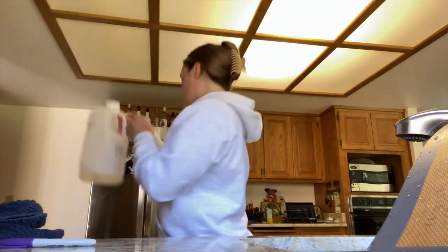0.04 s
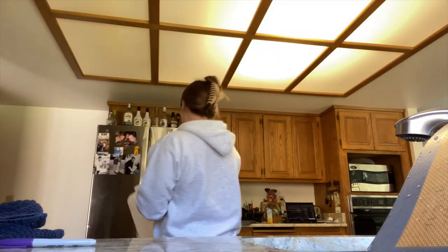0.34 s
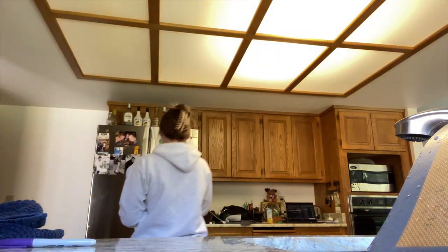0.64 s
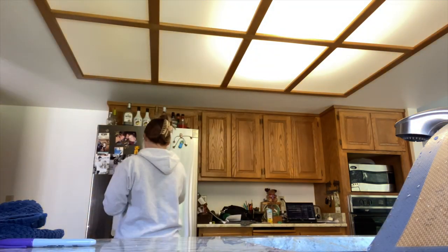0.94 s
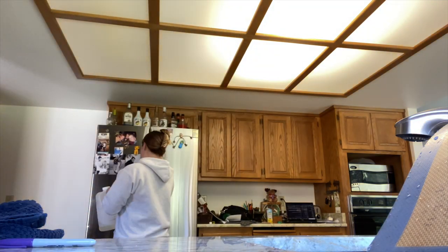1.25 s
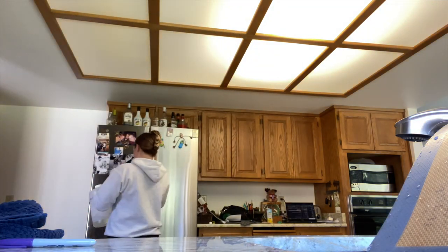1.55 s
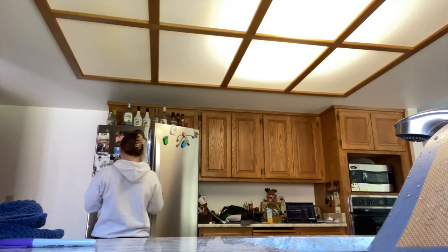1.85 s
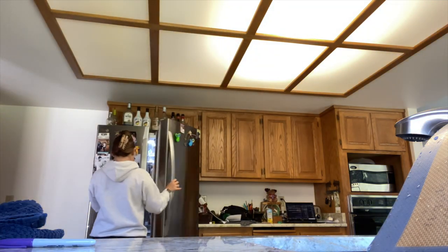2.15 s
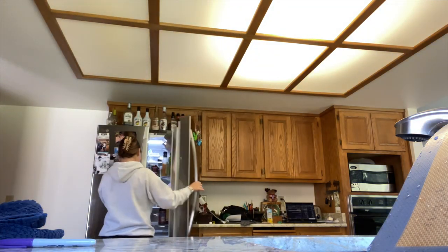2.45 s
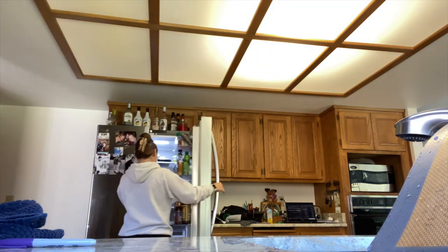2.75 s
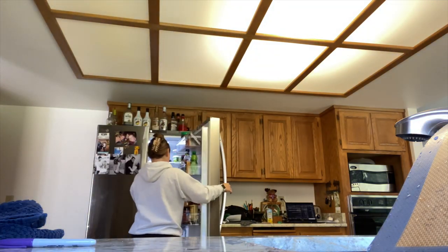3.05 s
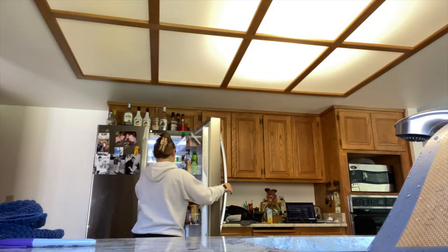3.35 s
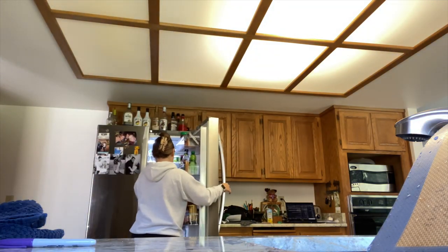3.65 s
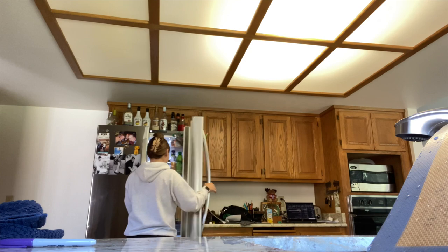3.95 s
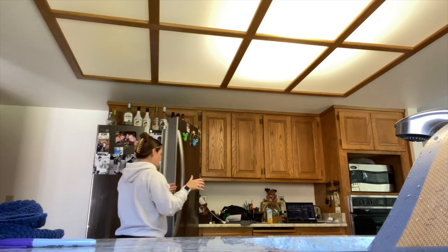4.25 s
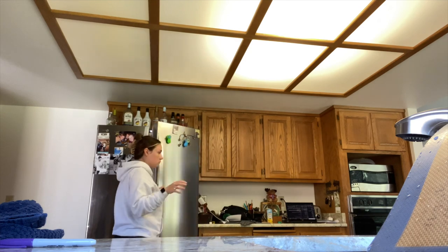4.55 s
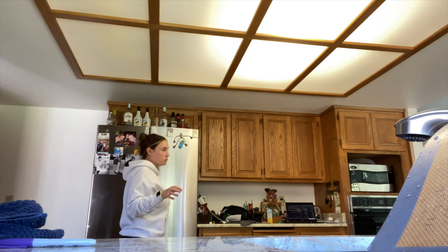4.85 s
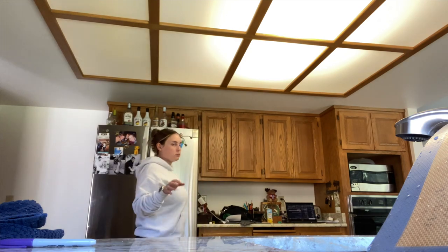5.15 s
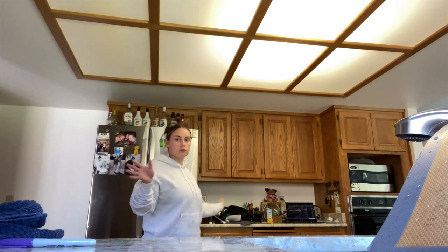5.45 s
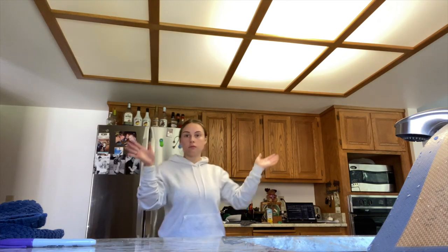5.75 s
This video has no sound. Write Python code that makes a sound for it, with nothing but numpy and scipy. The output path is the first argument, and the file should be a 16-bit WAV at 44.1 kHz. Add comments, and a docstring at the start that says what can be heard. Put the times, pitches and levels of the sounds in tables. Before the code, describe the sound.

Clothes rustle and a plastic jug knocks onto a refrigerator shelf, then the door slams with a hollow thump over a low hum.

```python
"""A jug goes into the refrigerator

Someone in rustling clothes carries a hollow plastic jug across a quiet kitchen and pulls the
refrigerator door off its rubber seal. The jug knocks onto a shelf and slides in; the door slams,
the cabinet booms, the shelf rings and bottles clink. Blows are dying noise plus ringing modes,
rubs are showers of tiny slips. The compressor hums, and a phone a few metres away hears it all."""
import sys
import numpy as np
from scipy import signal
from scipy.fft import rfft, irfft, next_fast_len
from scipy.io import wavfile

SR = 44100
rng = np.random.default_rng(int(sys.argv[2]) if len(sys.argv) > 2 else 0)


def unload_wav(signal):
    """Save mono or channel-first audio to the path in sys.argv[1] as 16-bit WAV at rate SR, clipped to [-1, 1]."""
    wavfile.write(
        sys.argv[1],
        SR,
        np.round(np.clip(np.atleast_2d(signal).T, -1, 1) * 32767).astype(np.int16),
    )


N = 264047
T = np.arange(N) / SR
ALIKE_HZ = 406  # well below this the two microphone ports hear the same


def undb(db):
    """Decibels to gain."""
    return 10 ** (np.asarray(db) / 20)


def fade(t, t60):
    """Exponential decay, 60 dB down after t60 seconds."""
    return np.exp(-np.log(1000) * t / t60)


def onset(t, rise):
    """Attack with a time constant of rise seconds."""
    return 1 - np.exp(-t / rise)


def add(out, start, sound):
    """Mix a sound into out from start seconds."""
    i = int(start * SR)
    out[:, i:i + sound.shape[1]] += sound[:, :N - i]


def butter(hz, kind="low", order=2):
    """A gentle Butterworth filter."""
    return signal.butter(order, hz, kind, fs=SR, output="sos")


def shape(x, *colours):
    """Minimum-phase EQ: the sum of some curves of (Hz, dB) points."""
    size = next_fast_len(x.shape[-1] // 2 + 2048) * 2
    log_hz = np.log(np.fft.rfftfreq(size, 1 / SR) + 1)
    db = sum(np.interp(log_hz, np.log(hz), gains) for hz, gains in map(np.transpose, colours))
    cepstrum = irfft(np.log(undb(db)))
    cepstrum[1:size // 2] *= 2
    cepstrum[size // 2 + 1:] = 0
    return irfft(rfft(x, size) * np.exp(rfft(cepstrum)))[..., :x.shape[-1]]


def ripple(depth_db):
    """An uneven EQ curve: each spot and each path through the room favours other frequencies."""
    hz = np.geomspace(250, 15000, 70)
    return list(zip(hz, depth_db * rng.standard_normal(len(hz))))


def diffuse(size):
    """Noise from all sides at two ports: alike in the bass, unrelated in the treble."""
    alike = np.exp(-(np.fft.rfftfreq(size, 1 / SR) / ALIKE_HZ) ** 2)
    mid, side = rfft(rng.standard_normal((2, size))) * np.sqrt([(1 + alike) / 2, (1 - alike) / 2])
    return irfft(np.array([mid + side, mid - side]), size)


def room(x, direct, t60):
    """Straight sound plus the reverberation of cupboards and walls."""
    tail = diffuse(SR) * fade(T[:SR], t60)
    tail /= np.sqrt(np.sum(tail ** 2) / 2)
    tail[:, 0] += direct
    return signal.fftconvolve(x[None], tail, axes=1)[:, :len(x)] / np.hypot(1, direct)


def ring(modes, rise, scatter=0.0035, widest_rad=0.92):
    """Decaying modes, detuned at random; the higher ones reach the two ports out of step."""
    t, out = T[:SR], 0
    for hz, db, t60 in modes:
        spread = widest_rad * min(hz / (2 * ALIKE_HZ), 1) * rng.choice([-1, 1])
        detuned_hz = hz * (1 + scatter * rng.standard_normal())
        phase = 2 * np.pi * detuned_hz * t + np.array([[.5], [-.5]]) * spread
        out = out + undb(db) * fade(t, t60) * np.sin(phase)
    return out * onset(t, rise)


def blow_noise(t60, rise, room_db=-7.5, room_t60=0.62, sparse_s=0.014, bass_rise_s=0.0087):
    """A blow dying away: a hard first arrival, then separate reflections thicken into a tail."""
    t = T[:SR]
    patches = np.repeat(rng.standard_normal(SR // 30) - .5, 30)
    noise = diffuse(SR) * undb(3 * np.exp(-t / sparse_s) * patches)
    crack = undb(1) * fade(t, t60=0.045)
    tail = undb(room_db) * fade(t, room_t60)
    decay = np.sqrt(crack ** 2 + fade(t, t60) ** 2 + tail ** 2)
    # the bass needs a moment to build up in the cabinet and the room
    bass = signal.sosfiltfilt(butter(380), noise)
    return (noise - bass * np.exp(-t / bass_rise_s)) * decay * onset(t, rise)


def blow(colour, bass_db, edge_db, t60, note_hz, note_db, *,
         noise_db, treble_db, rise, note_t60, modes=(), modes_db=0):
    """A blow shakes many close resonances, the note of the struck spot and any main modes."""
    contact = [(200, bass_db), (400, 0), (1000, 0),
               (1700, edge_db), (3000, edge_db), (5500, edge_db + treble_db)]
    body = undb(noise_db) * shape(blow_noise(t60, rise), colour, contact, ripple(depth_db=3.5))
    note = ring([(note_hz, note_db, note_t60)], rise)
    return body + note + undb(modes_db) * ring(modes, rise, scatter=0.01036)


def stroke(start, attack, stop, db, slope_db_per_s, t60):
    """Envelope of one movement: it swells, grows or eases while it lasts, then dies away."""
    swell = np.sin(np.pi / 2 * np.clip((T - start) / attack, 0, 1)) ** 2
    held_db = db + slope_db_per_s * (np.clip(T, start, stop) - start)
    return swell * undb(held_db) * fade(np.maximum(T - stop, 0), t60)


def friction(envelope, colour, slips_per_s, spread_db):
    """Dense tiny slips of uneven size, following a stroke, heard through the room."""
    slips = (rng.random(N) < slips_per_s / SR) * rng.standard_normal(N)
    sizes = undb(spread_db * np.minimum(rng.exponential(size=N), 4))
    rub = shape(slips * sizes, colour)
    return room(rub / rub.std() * envelope, direct=0.36, t60=0.4)


# The colour of still air. Each row: frequency in Hz, gain in dB.
AIR_COLOUR = [(90, -14), (180, -21), (280, -28), (390, -26), (520, -29), (800, -30), (1050, -48.5),
              (1700, -49), (3000, -57.5), (7500, -56), (15000, -64)]

def room_tone(air_db=-56.5, rumble_db=-62):
    """Still room air over a faint rumble."""
    hiss = shape(diffuse(N), AIR_COLOUR)
    rumble = shape(diffuse(N), [(15, -19), (30, -9), (60, -8), (110, -25), (250, -24), (1000, -78)])
    return undb(air_db) * hiss / hiss.std() + undb(rumble_db) * rumble / rumble.std()


# The door swings open and shut. Each row: time in seconds, opening angle in degrees.
DOOR_SWING = [(1.7, 0), (2.12, 25), (2.75, 90), (3.7, 90), (4.25, 60), (4.65, 25), (4.9, 0)]
# The hum follows the door. Each row: opening angle in degrees, level in dB.
HUM_BY_ANGLE = [(0, -40.5), (25, -39.5), (60, -42.5), (90, -43)]
# The motor's faint steady tones. Each row: frequency in Hz, level in dB.
MOTOR_TONES = [(79, -57.5), (119.5, -66.5), (387.6, -73.5)]

def compressor(hum_hz=53.3):
    """The motor's low hum changes level as the door turns; its weaker tones hold steady."""
    angle = np.interp(T, *np.transpose(DOOR_SWING))
    hum = undb(np.interp(angle, *np.transpose(HUM_BY_ANGLE))) * np.sin(2 * np.pi * hum_hz * T)
    tones = sum(undb(db) * np.sin(2 * np.pi * (hz * T + rng.random())) for hz, db in MOTOR_TONES)
    return np.sqrt(2) * np.tile(hum + tones, (2, 1))


# Arms and body move in a sweatshirt. Each row: peak time in seconds, seconds to swell by 60 dB,
# level in dB, bass and treble trims in dB.
BODY_MOVES = [(0.187,0.069,-45.5,-8,-18), (0.339,0.89,-47.5,12,-6), (0.458,0.24,-60,9,-1),
              (0.586,0.076,-71,-2,-16), (0.71,0.91,-51,11,-5.5), (1.135,0.2,-45,9,-24),
              (1.221,0.78,-57,11,2.5), (1.472,0.034,-65,-1,-18), (2.09,0.41,-59,12.5,-15),
              (2.17,0.79,-50,-16,-9), (2.371,0.74,-62,-20,-8), (2.485,0.28,-75,25,-34),
              (2.983,0.64,-67,-25,-11), (3.885,1,-55.5,-24,-8), (4.345,0.18,-63,-8.5,5),
              (4.41,0.36,-58.5,0,-22), (4.655,0.81,-61.5,-9,-8.5), (5.3,0.82,-68.5,-12,9),
              (5.574,0.82,-61,-20,-7), (5.69,0.14,-53.5,1.5,-7), (5.79,0.4,-64,9,-13),
              (5.88,0.72,-55.5,9.5,-2.5), (5.945,0.4,-66,-8,4)]
# The colour of the cloth. Each row: frequency in Hz, gain in dB.
CLOTH_COLOUR = [(60, 0), (200, 6), (400, -1), (800, 3.5), (1200, 1.5), (2000, 0.5), (4000, -6.5),
                (7000, -14.5), (14000, -22.5)]

def clothes(treble_lift_db=10, flutter_db=2, room_t60=0.52):
    """Cloth brushes on cloth, swelling with each move; shifting folds keep changing its colour."""
    folds = [shape(diffuse(N), CLOTH_COLOUR, ripple(depth_db=2.5)) for _ in range(8)]
    shifts = np.linspace(0, T[-1], 60)
    cloth = sum(fold * np.interp(T, shifts, rng.random(len(shifts)) ** 2) for fold in folds)
    flutter = np.interp(T, np.linspace(0, T[-1], 500), rng.standard_normal(500))
    cloth *= undb(flutter_db * flutter) / cloth.std()
    flap = signal.sosfiltfilt(butter(900), cloth)
    hiss = signal.sosfiltfilt(butter(5500, "high"), cloth)
    power = 0
    for peak, swell_s, db, bass_db, treble_db in BODY_MOVES:
        swell = fade(np.maximum(peak - T, 0), swell_s)
        release = fade(np.maximum(T - peak, 0), room_t60)
        band_gains = undb([bass_db, 0, treble_db + treble_lift_db])
        power = power + np.outer(band_gains, undb(db) * swell * release) ** 2
    return sum(band * gain for band, gain in zip((flap, cloth - flap - hiss, hiss), np.sqrt(power)))


# The palm's stroke: start, attack, stop and decay in seconds, level in dB, slope in dB per second.
PALM_STROKE = dict(start=0.1, attack=0.0098, stop=0.12, db=-42, slope_db_per_s=-53, t60=0.27)
# The colour of skin on plastic. Each row: frequency in Hz, gain in dB.
PALM_COLOUR = [(200, 1.5), (2600, -16), (3500, -17), (3800, -11), (4200, -11), (5000, -14), (5900, -12.5),
               (7500, -17.5), (14000, -37)]

def palm_swish():
    """A palm slides briefly on the jug."""
    return friction(stroke(**PALM_STROKE), PALM_COLOUR, slips_per_s=4200, spread_db=3)


# Sleeve and hand scrape. Each row: start and length in seconds, level in dB,
# opening and closing resonance in Hz.
SCRAPES = [(0.101, 0.02, -52, 3830, 4250), (0.175, 0.077, -54, 3380, 3600), (0.25, 0.13, -64, 3600, 3950),
           (1.466, 0.014, -47.5, 2420, 2460), (2.07, 0.022, -53.5, 1720, 1800),
           (2.095, 0.096, -67, 3300, 4150), (2.402, 0.074, -65, 2020, 1200),
           (2.968, 0.03, -62.5, 3220, 3420), (2.969, 0.03, -57.5, 1790, 2100),
           (3.834, 0.073, -61, 5040, 3580), (3.864, 0.04, -58.5, 1705, 1600)]

def scrapes(width=0.16, skirt_db=-13, slips_per_s=3000):
    """Quick slips of cloth and skin ring a broad resonance that shifts as the contact moves."""
    out = np.zeros(N)
    for start, length, db, start_hz, end_hz in SCRAPES:
        along = (T - start) / length
        span = (along > 0) & (along < 1)
        slips = ((rng.random(SR) < slips_per_s / SR) * rng.standard_normal(SR))[:span.sum()]
        glide_hz = start_hz + (end_hz - start_hz) * along[span]
        # a moving band-pass: shift down, low-pass, shift back up
        carrier = np.exp(2j * np.pi * np.cumsum(glide_hz) / SR)
        resonance = (carrier * signal.sosfilt(butter(width * start_hz), slips / carrier)).real
        skirt = signal.sosfilt(butter([start_hz / 2, start_hz * 2], "band", order=1), slips)
        rub = resonance / (resonance.std() + 1e-9) + undb(skirt_db) * skirt / (skirt.std() + 1e-9)
        out[span] += undb(db) * rub * np.sqrt(np.sin(np.pi * along[span]))
    return room(out, direct=0.8, t60=0.35)


# Knocks on the jug. Each row: start in seconds, relative level, bass and hard edge in dB,
# decay in seconds, the struck spot's note in Hz, its trim in dB, rise in seconds.
JUG_KNOCKS = [(0.18,-48.5,-9,-5,0.039,1780,-12,0.0012), (0.369,-45,-18,-14.5,0.27,826,-5,0.0012),
              (1.092,-38.5,-7,-19.5,0.29,751,-2,0.0019), (1.230,-40,-6,-15.5,0.15,358,13.5,0.0012),
              (1.269,-40.5,-12,-16,0.085,719,4.5,0.00064), (3.185,-30.5,-16.5,-25.5,0.69,486.4,9.5,0.0048),
              (3.393,-33.5,-5.5,-30,0.15,256,-0.5,0.0045), (3.455,-17.5,-12,-23,0.16,518,2.5,0.0063),
              (3.611,-27.5,-11.5,-38,0.057,418,-12,0.0065)]
# The colour of a knock. Each row: frequency in Hz, gain in dB.
JUG_COLOUR = [(40, -24), (100, 8), (250, 4.5), (500, -4), (750, -10), (1000, -19), (1400, 0.5), (3000, -6),
              (6000, -11.5), (14000, -25)]
# The jug's hollow ring. Each row: frequency in Hz, relative level in dB, decay in seconds.
JUG_MODES = [(79.5, -7.5, 0.93), (168.8, -6.5, 0.42), (270, -7, 0.26), (380, -9, 0.48), (520, -4, 0.48),
             (736, -2.5, 0.22), (800, -3, 0.26)]

def jug_knocks():
    """The soft, hollow jug is bumped in the hand and set down on the shelf."""
    out = np.zeros((2, N))
    for start, db, *contact, rise in JUG_KNOCKS:
        knock = blow(JUG_COLOUR, *contact, noise_db=21, treble_db=-5.5, rise=rise,
                     note_t60=0.19, modes=JUG_MODES, modes_db=-5)
        add(out, start, undb(db) * knock)
    return out


# Footfalls. Each row: start in seconds, relative level, bass and hard edge in dB, decay in seconds.
STEPS = [(0.578,-29,-2,-1.5,0.32), (0.683,-38.5,6.5,-1,0.53), (1.121,-39,-1,4,0.12), (2.184,-48.5,-4,8,0.3),
         (2.622,-43.5,-8,0,0.54), (5.404,-34.5,10,-18,0.26), (5.872,-47.5,-31,-1,0.59)]
# The colour of a step. Each row: frequency in Hz, gain in dB.
STEP_COLOUR = [(40, -48), (100, -1.5), (200, -5.5), (450, 0.5), (800, -12), (1500, -16), (3000, -25),
               (6000, -8.5), (14000, -27)]

def footsteps():
    """Feet land; the floor answers each with the same note."""
    out = np.zeros((2, N))
    for start, db, *contact in STEPS:
        step = blow(STEP_COLOUR, *contact, note_hz=703, note_db=-4.5, note_t60=0.12,
                    noise_db=14, treble_db=-24, rise=0.0038)
        add(out, start, undb(db) * step)
    return out


# Bottles touch. Each row: start in seconds, pitch in Hz, relative level in dB, decay in seconds.
CLINKS = [(0.638, 2235, -39.5, 0.07), (1.226, 2870, -44, 0.14), (1.253, 6420, -55.5, 0.1),
          (1.536, 1540, -37.5, 0.036), (5.406, 2203, -52, 0.29)]
# A bottle's partials, as multiples of the lowest.
GLASS_RATIOS = [1, 1.03, 1.09, 1.4, 1.92, 2.23]
# The balance of those partials, in dB.
GLASS_DB = [3, 2.5, -9, -20, -23, -25]

def bottle_clinks(gain_db=1, linger_db=-19, linger_t60=0.4):
    """The two lowest partials of the glass beat; a thin ring lingers once the bottles part."""
    out = np.zeros((2, N))
    for start, hz, db, t60 in CLINKS:
        touch = [(hz * ratio, part_db, t60) for ratio, part_db in zip(GLASS_RATIOS, GLASS_DB)]
        linger = [(part_hz, part_db + linger_db, linger_t60) for part_hz, part_db, _ in touch]
        add(out, start, undb(db + gain_db) * ring(touch + linger, rise=0.0028, scatter=0.0047))
    return out


# Weight comes down. Each row: start in seconds, level in dB.
THUDS = [(0.662, -31.5), (1.133, -18.5), (1.7, -23), (3.222, -30), (3.472, -28.5), (4.92, -14)]
# The floor's low end. Each row: frequency in Hz, relative level in dB, decay in seconds.
FLOOR_MODES = [(54.9, 2, 0.33), (59.15, -6.5, 0.28), (76.6, -11, 0.53)]

def floor_thuds():
    """The floor booms under weight."""
    out = np.zeros((2, N))
    for start, db in THUDS:
        add(out, start, undb(db) * ring(FLOOR_MODES, rise=0.0099))
    return out


# Light plastic ticks. Each row: start in seconds, relative level in dB, decay in seconds,
# trim of the first snap in dB.
TICKS = [(0.767,-56,0.85,12), (1.118,-50,0.1,7), (1.447,-58,0.95,-4), (1.695,-41,0.38,0),
         (1.773,-50,0.2,11.5), (3.230,-45.5,0.14,4.5), (3.451,-41.5,0.11,-1), (3.598,-48,0.07,-5),
         (4.782,-54,0.038,12.5), (4.911,-31.5,0.21,-3), (5.08,-41.5,0.1,-5)]
# The colour of a tick. Each row: frequency in Hz, gain in dB.
TICK_COLOUR = [(500, 4.5), (2000, 10), (4000, 0), (8000, 1.5), (12000, -2), (15000, -9.5)]

def plastic_ticks(gain_db=3, tail_db=-14, port_lag_s=0.00005):
    """Each tick snaps to the right port, an instant later to the left, then scatters round the room."""
    out, t = np.zeros((2, N)), T[:SR]
    for start, db, t60, snap_db in TICKS:
        snap = undb(snap_db) * rng.standard_normal(SR) * fade(t, t60=0.01)
        straight = np.array([np.roll(snap, round(port_lag_s * SR)), snap])
        decay = np.hypot(fade(t, t60), undb(tail_db) * fade(t, t60=0.55))
        scattered = diffuse(SR) * decay * onset(t, rise=0.0025)
        add(out, start, undb(db + gain_db) * shape(straight + scattered, TICK_COLOUR))
    return out


# Hits on the door. Each row: start in seconds, relative level, bass and hard edge in dB,
# decay in seconds, the struck spot's note in Hz, its trim in dB.
DOOR_BLOWS = [(1.418,-38,-15,-40,0.33,360,-2.5), (1.487,-31.5,-12,-24,0.32,518,-0.5),
              (1.513,-36,-4,-26,0.18,402,-2), (1.616,-21.5,-24,-17.5,0.11,1353,-12),
              (1.622,-37,-13,-18,0.092,572,7), (1.692,-17.5,-10.5,-15,0.16,701,-6.5),
              (4.788,-22,-15,-7.5,0.2,1473,-13), (4.835,-16.5,-11,-14,0.45,494,-5),
              (4.912,-4,-18.5,-21,0.19,724,-10), (4.968,-13,-7.5,-20,0.029,754,-6),
              (5.087,-26,-0.5,-18,0.045,384,-8)]
# The colour of a hit. Each row: frequency in Hz, gain in dB.
DOOR_COLOUR = [(40, 14), (100, 11), (170, 17), (350, -4.5), (560, -6), (760, -5), (1050, -14), (1500, -2),
               (3000, -10.5), (5000, -3), (8000, -5), (14000, -16)]
# The door's ring. Each row: frequency in Hz, relative level in dB, decay in seconds.
DOOR_MODES = [(182.2, -2, 0.28), (354.6, -14, 0.78), (381.6, -14, 0.63), (498.4, -16, 0.45),
              (725, -9, 0.45), (794, -20.5, 0.12), (884, -16, 0.24), (870, 3.5, 0.011), (1062, -12, 0.17),
              (1510, -2, 0.018), (1207, -7.5, 0.059), (1334, -8, 0.12), (1760, -22, 0.43), (2095, -25, 0.5)]

def door_blows(tap_rise=0.0018, slam_rise=0.0012, slam_db=-4):
    """The door jerks free of its seal; later it slams and rebounds. Harder blows rise faster."""
    out = np.zeros((2, N))
    for start, db, *contact in DOOR_BLOWS:
        force = min(undb(db - slam_db), 1)
        rise = tap_rise + (slam_rise - tap_rise) * force
        hit = blow(DOOR_COLOUR, *contact, noise_db=11.5, treble_db=-19, rise=rise,
                   note_t60=0.14, modes=DOOR_MODES, modes_db=-11)
        add(out, start, undb(db) * hit)
    return out


# The pull: start, attack, stop and decay in seconds, level in dB, slope in dB per second.
PEEL_STROKE = dict(start=1.446, attack=0.054, stop=1.642, db=-39.5, slope_db_per_s=14.5, t60=0.82)
# The colour of peeling rubber. Each row: frequency in Hz, gain in dB.
PEEL_COLOUR = [(60, 9.5), (200, -2), (500, 7.5), (800, 4), (1100, -7), (1600, -1.5), (3000, -18.5),
               (6000, -25), (14000, -36.5)]

def seal_peel():
    """The rubber seal peels harder as the pull grows."""
    return friction(stroke(**PEEL_STROKE), PEEL_COLOUR, slips_per_s=1200, spread_db=2)


# Booms under the heavy hits. Each row: start in seconds, level in dB.
BOOMS = [(1.700, -28), (3.474, -20), (3.611, -33), (4.918, -16.5), (4.964, -32), (5.09, -32.5)]
# The cabinet's body. Each row: frequency in Hz, relative level in dB, decay in seconds.
CABINET_MODES = [(146.5, -10.5, 0.41), (175, 0, 0.27), (229.4, -2.5, 0.38), (283, -7, 0.13),
                 (337.3, 3, 0.153), (403.5, -4, 0.14)]

def cabinet_booms():
    """The hollow cabinet answers heavy blows with a low boom."""
    out = np.zeros((2, N))
    for start, db in BOOMS:
        add(out, start, undb(db) * ring(CABINET_MODES, rise=0.0085, scatter=0.011))
    return out


def panel_drone(start=1.9, hz=84.4, db=-45):
    """The door's panel drones as it swings open, fading out over one second."""
    out = np.zeros((2, N))
    drone = ring([(hz, 0.014, 7.4)], rise=0.01) * np.linspace(1, 0, SR)
    add(out, start, undb(db) * drone)
    return out


# Jolts to the shelf. Each row: start in seconds, level in dB, rise in seconds.
SHELF_JOLTS = [(3.46, -57, 0.0055), (3.55, -41.5, 0.0039), (4.914, -42.5, 0.011), (5.245, -61.5, 0.01),
               (5.335, -69, 0.015)]
# The shelf's ring. Each row: frequency in Hz, relative level in dB, decay in seconds.
SHELF_MODES = [(1350, 2.5, 0.6), (1332, 1.5, 0.79), (1410, -11, 0.35), (1940, -9, 0.76), (2500, -14, 0.8)]

def shelf_rattle():
    """Jolts set the refrigerator's shelf ringing; it rattles on after the slam."""
    out = np.zeros((2, N))
    for start, db, rise in SHELF_JOLTS:
        add(out, start, undb(db) * ring(SHELF_MODES, rise, scatter=0.00283))
    return out


# The push: start, attack, stop and decay in seconds, level in dB, slope in dB per second.
SLIDE_STROKE = dict(start=3.605, attack=0.023, stop=3.644, db=-26.5, slope_db_per_s=-42, t60=0.37)
# The colour of the jug rubbing the shelf. Each row: frequency in Hz, gain in dB.
SLIDE_COLOUR = [(60, -18), (180, 4), (260, -19), (430, 7), (600, -3), (780, 1), (1050, -14), (1400, -19),
                (2300, -21), (4000, -34), (14000, -42)]

def jug_slide():
    """The jug slides on its shelf, quieter as it slows."""
    return friction(stroke(**SLIDE_STROKE), SLIDE_COLOUR, slips_per_s=610, spread_db=5)


# The puff: start, attack, stop and decay in seconds, level in dB, slope in dB per second.
DRAUGHT_STROKE = dict(start=4.39, attack=0.58, stop=4.8, db=-56.5, slope_db_per_s=23, t60=0.35)
# The colour of the pushed air. Each row: frequency in Hz, gain in dB.
DRAUGHT_COLOUR = [(30, -3), (70, 3), (110, 0), (200, -16), (500, -10.5), (1500, -34.5)]

def draught():
    """The closing door pushes a low puff of air out of the cabinet."""
    puff = shape(diffuse(N), DRAUGHT_COLOUR)
    return puff / puff.std() * stroke(**DRAUGHT_STROKE)


# The frame's short ring. Each row: frequency in Hz, relative level in dB, decay in seconds.
CLACK_MODES = [(785, -3, 0.05), (880, 0, 0.05), (1040, -7, 0.04)]

def frame_clack(start=4.9125, db=-5.5):
    """The door's edge clacks on the frame as it slams."""
    out = np.zeros((2, N))
    add(out, start, undb(db) * ring(CLACK_MODES, rise=0.00069))
    return out


def scene():
    """Steps, jug and door over the hum of the kitchen."""
    bed = room_tone() + compressor()
    person = clothes() + palm_swish() + scrapes() + footsteps() + floor_thuds()
    contents = jug_knocks() + bottle_clinks() + plastic_ticks() + shelf_rattle() + jug_slide()
    door = door_blows() + seal_peel() + cabinet_booms() + panel_drone() + draught() + frame_clack()
    return bed + person + contents + door


def record(dry, left_bass_db=2.5, ceiling=0.85, notch_db=-20, top_hz=15850):
    """The phone hears more bass on the left, rounds peaks, thins the lows and notches the treble."""
    left = shape(dry[0], [(150, left_bass_db / 2), (450, 0.0052)])
    right = shape(dry[1], [(150, -left_bass_db / 2), (450, 0.0074)])
    rounded = ceiling * np.tanh(np.array([left, right]) / ceiling)
    colour = [(30, -9), (52, 0.017), (8700, 0.1), (9400, notch_db), (9900, notch_db),
              (10700, 0.018), (13400, 0.011), (14700, -9)]
    top_cut = signal.ellip(8, .2, 80, top_hz, fs=SR, output="sos")
    return signal.sosfilt(top_cut, shape(rounded, colour))


dry = scene()
out = record(dry)
unload_wav(out)
```